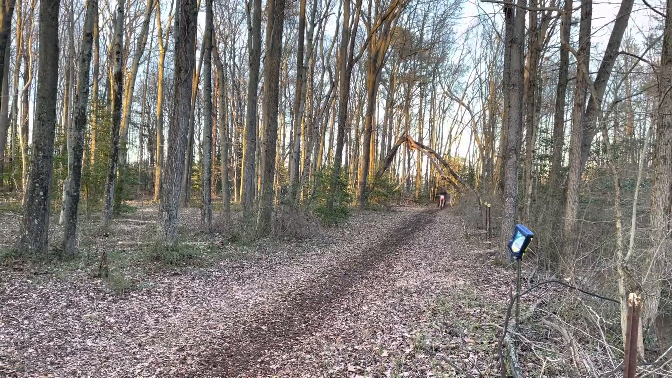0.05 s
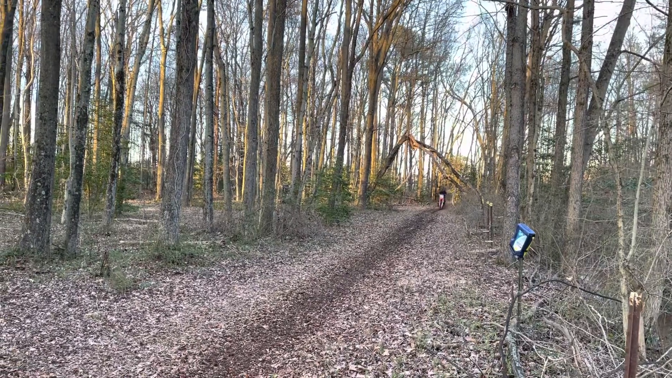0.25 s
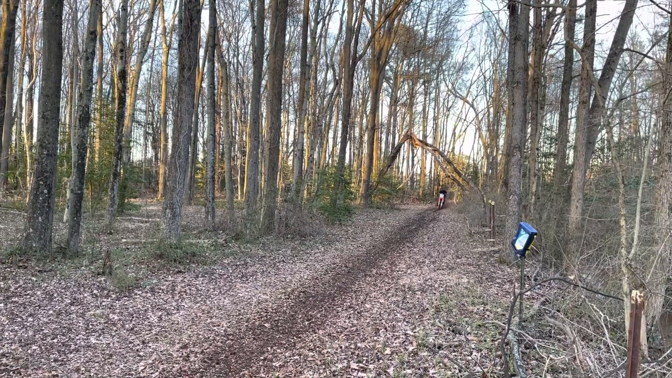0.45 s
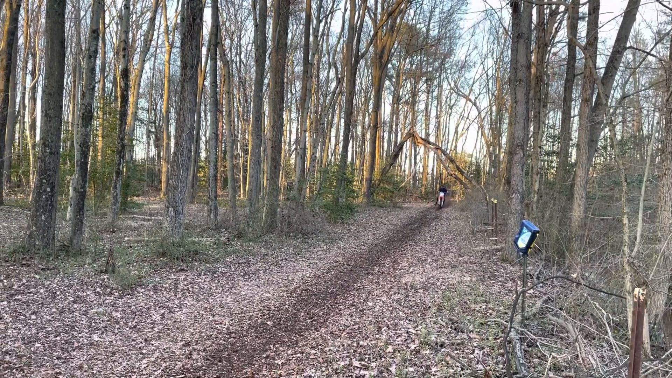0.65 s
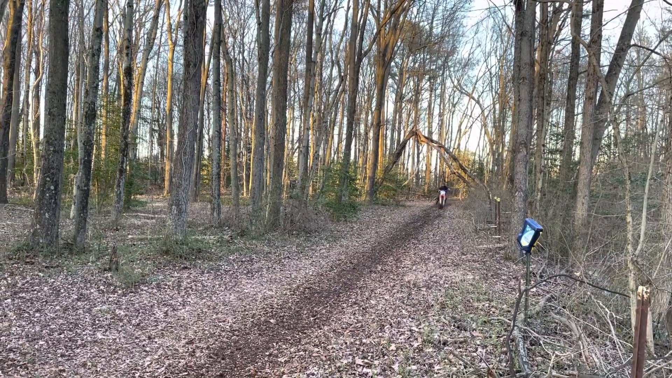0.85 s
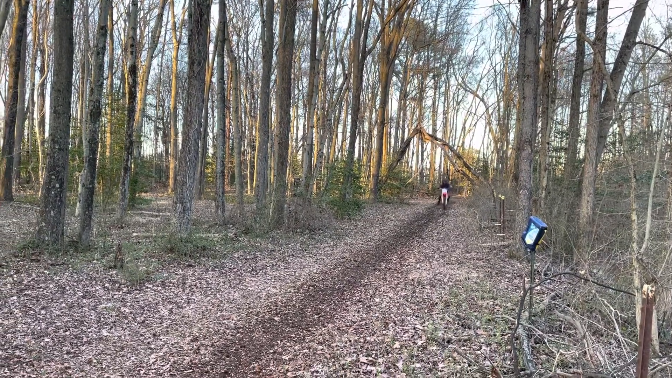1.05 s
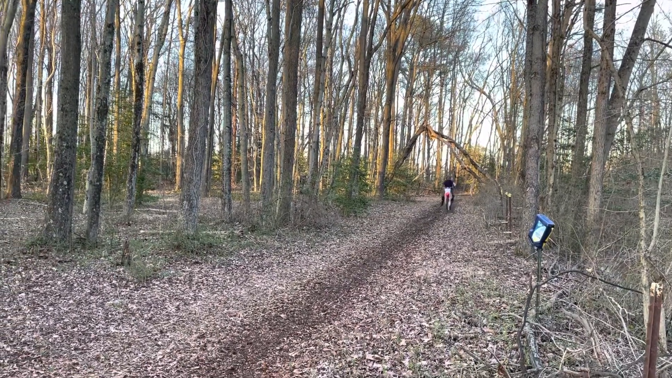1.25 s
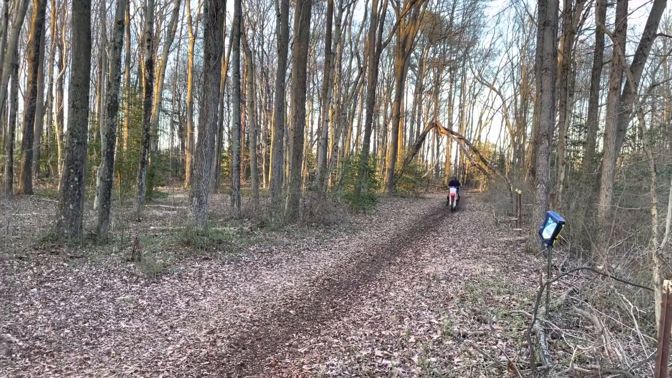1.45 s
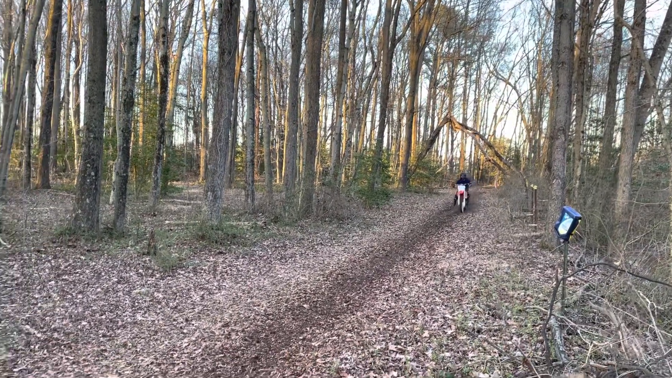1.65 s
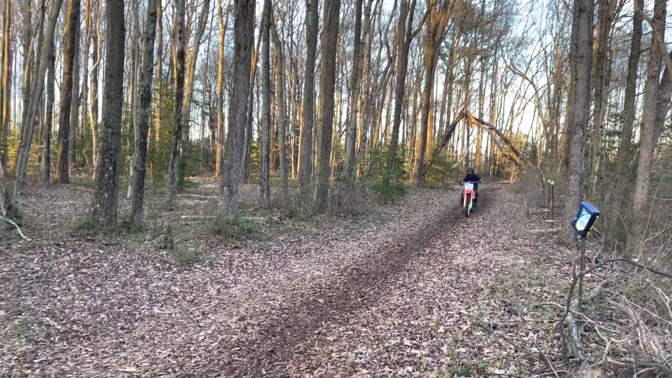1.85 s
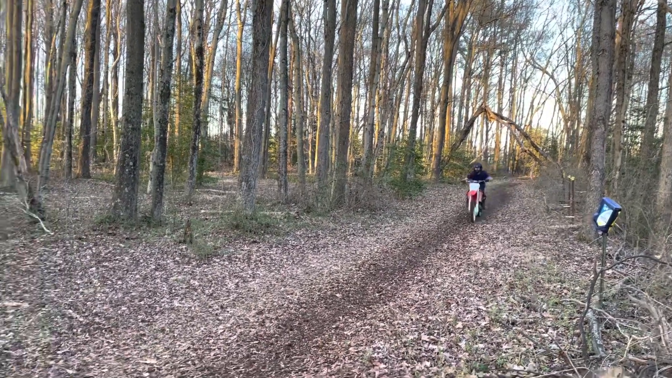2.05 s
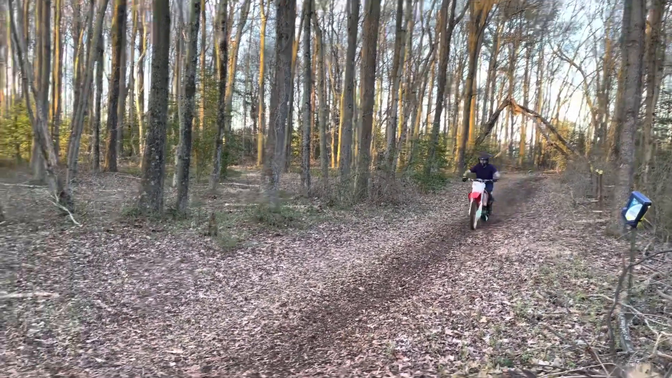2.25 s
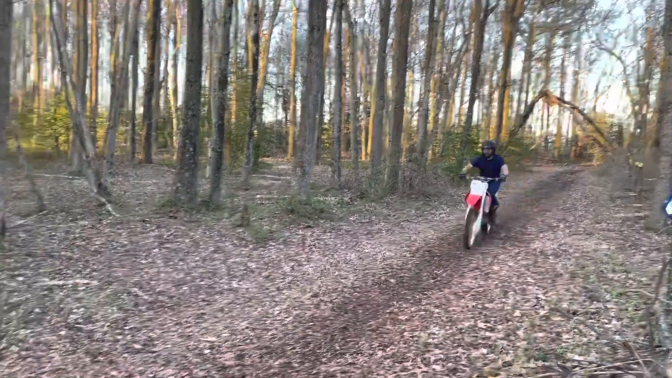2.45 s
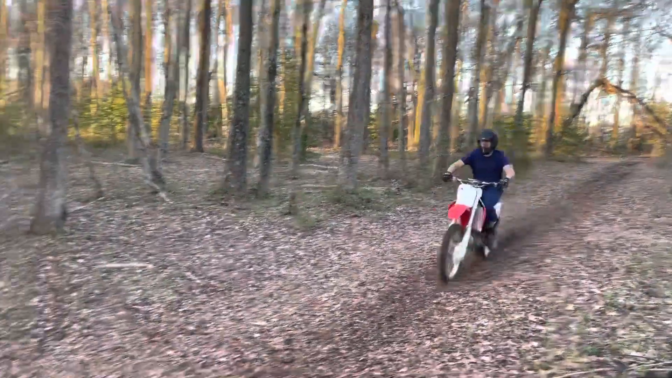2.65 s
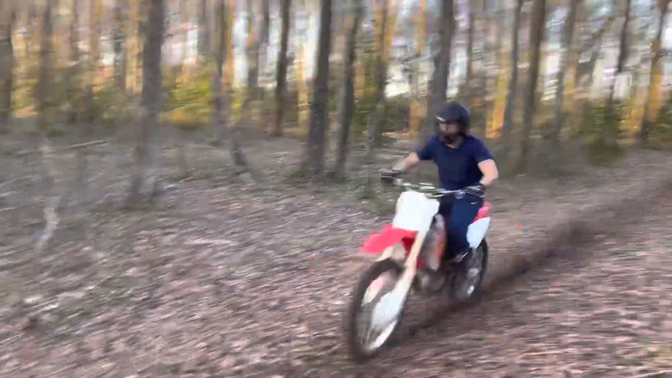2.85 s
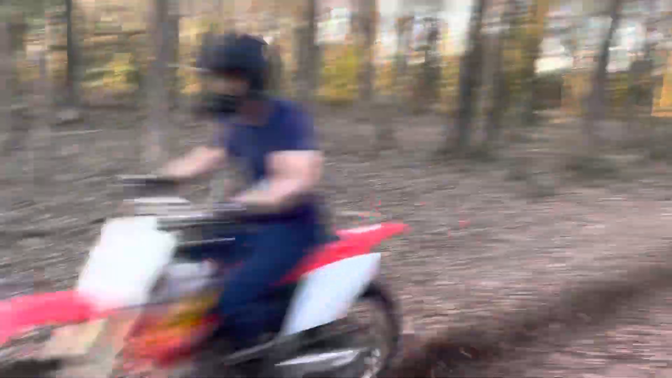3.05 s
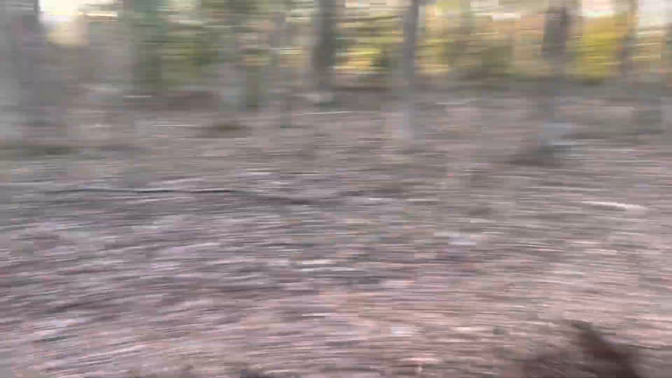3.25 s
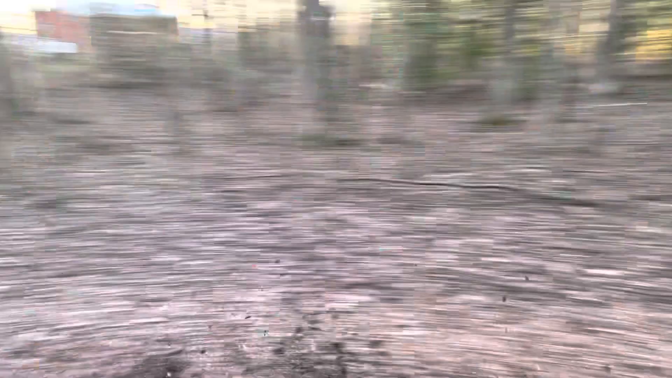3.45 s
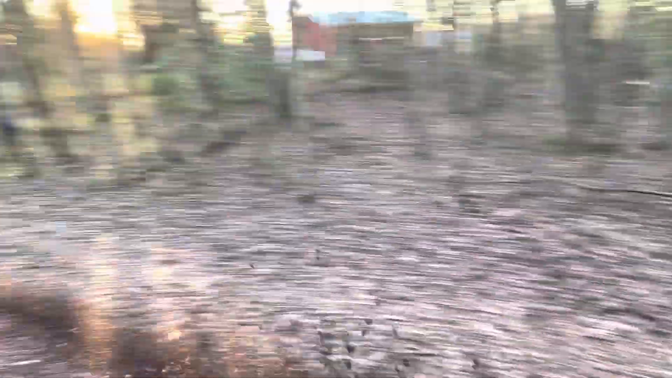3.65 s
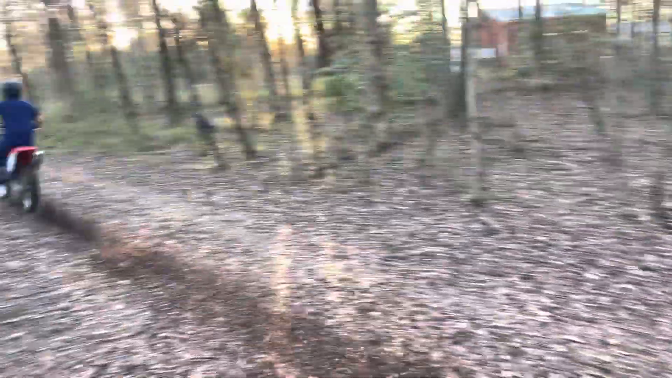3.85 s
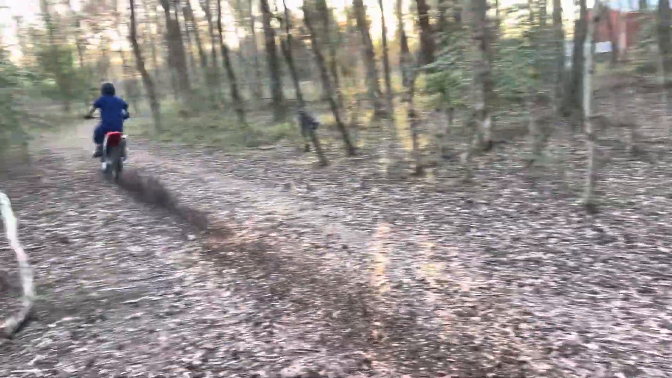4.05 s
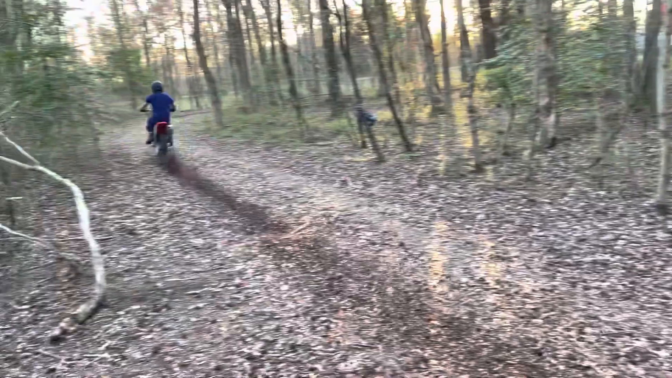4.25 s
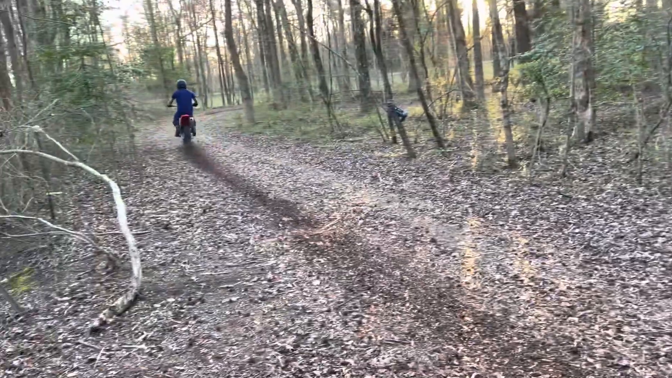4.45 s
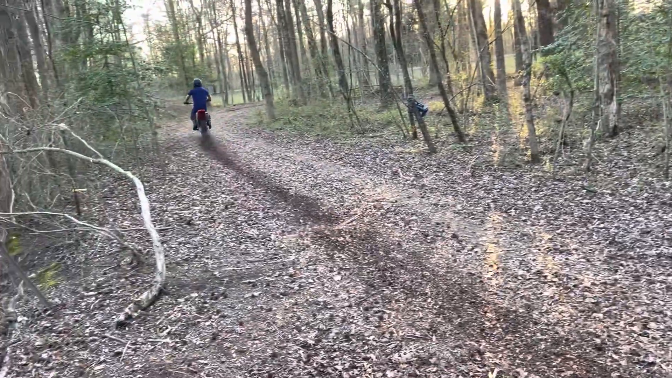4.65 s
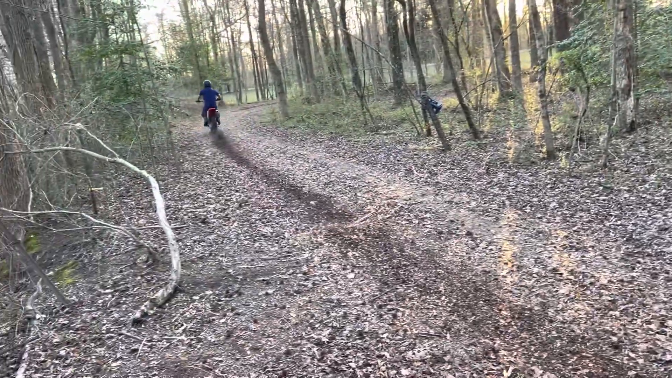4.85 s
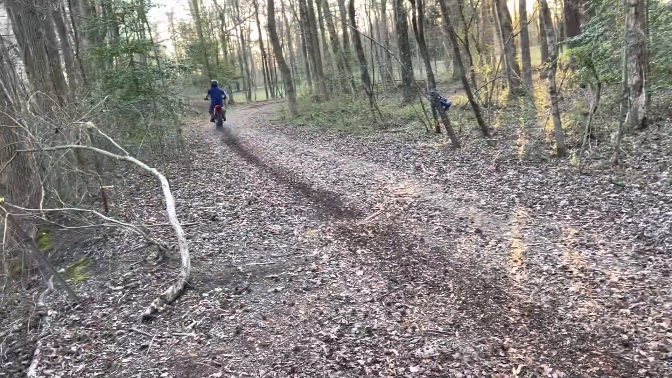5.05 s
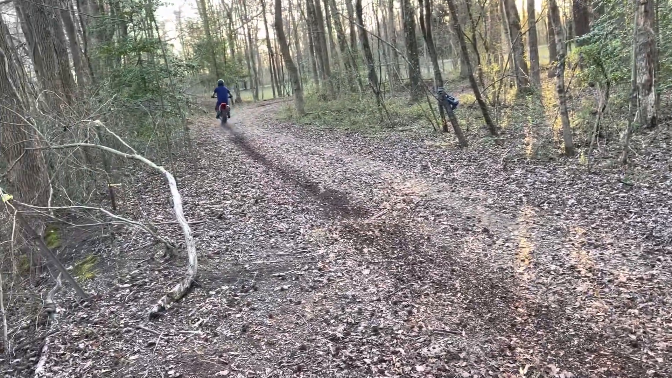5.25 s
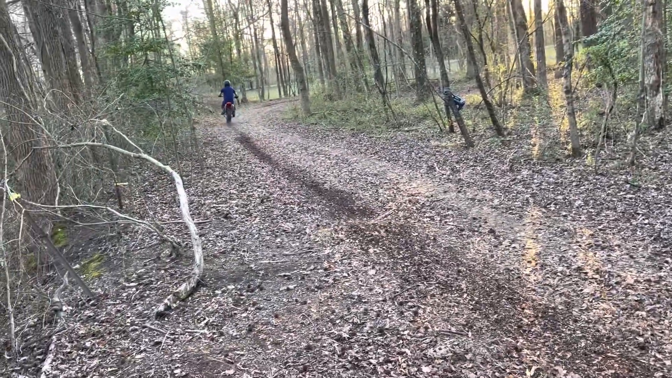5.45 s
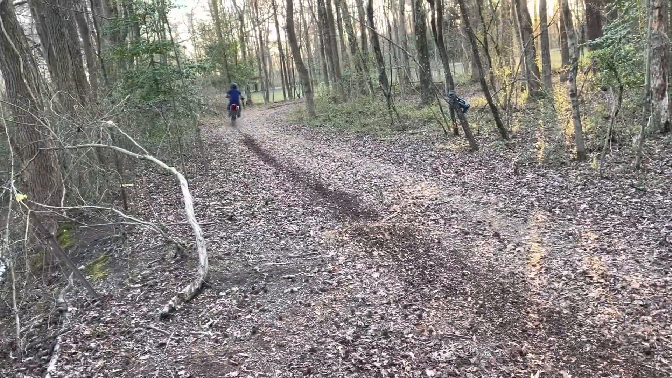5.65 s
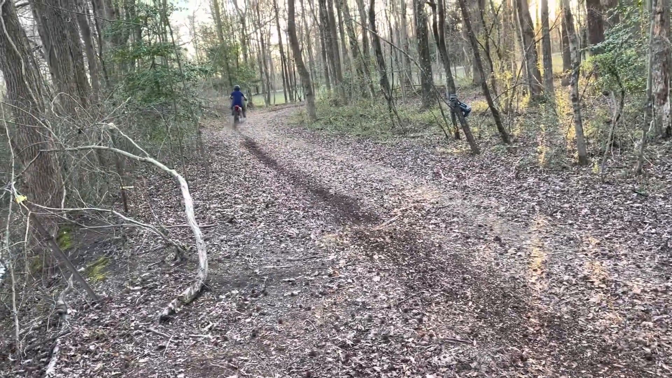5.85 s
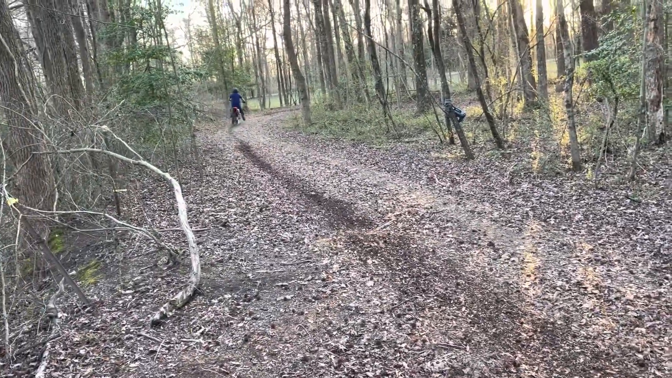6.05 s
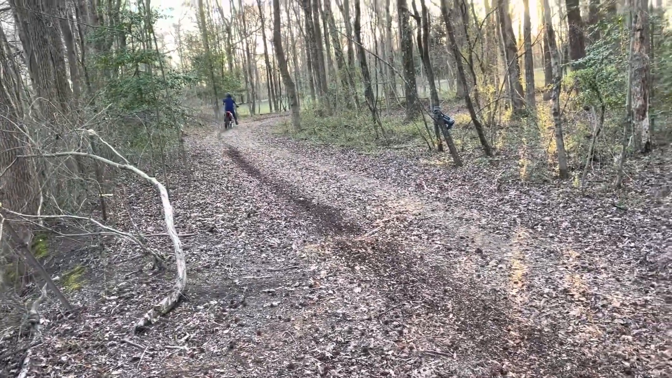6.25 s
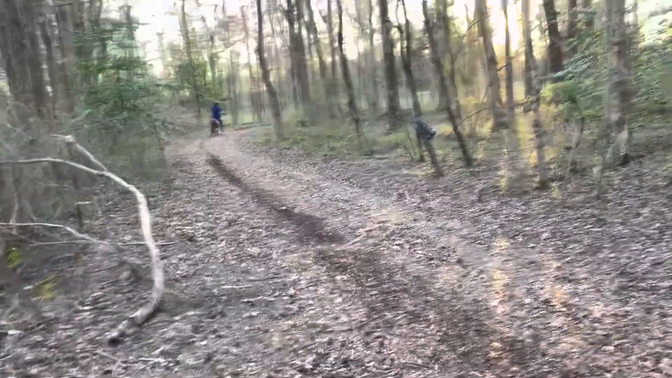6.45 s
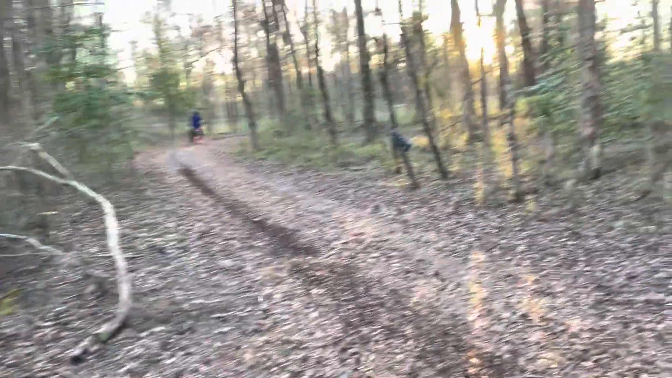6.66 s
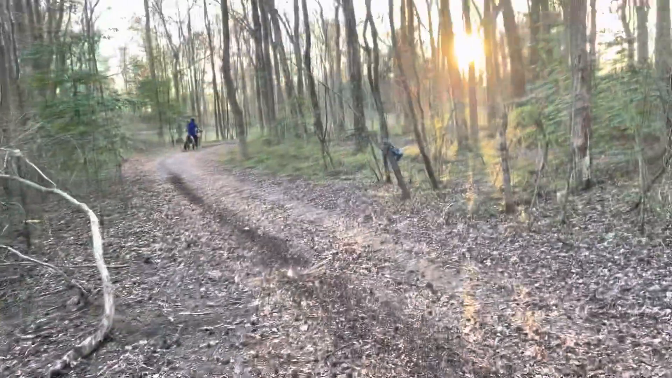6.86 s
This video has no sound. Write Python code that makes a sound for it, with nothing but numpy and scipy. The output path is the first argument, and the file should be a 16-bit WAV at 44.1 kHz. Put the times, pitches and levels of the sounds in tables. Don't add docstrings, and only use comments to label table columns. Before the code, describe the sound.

A dirt bike's low, raspy exhaust rises and dips as it nears a handheld microphone beside a leafy trail. It coasts down in pitch, sweeps past loudly with clattering engine noise and tyres crunching leaves, then breaks into separate slow thuds. A quick double bark of throttle follows, then a quieter uneven putter moving off. Dry twigs and brush stir nearby; tree trunks give a short, dull scatter.

```python
import sys
import numpy as np
from scipy import signal
from scipy.fft import rfft, irfft, next_fast_len
from scipy.io import wavfile
from scipy.ndimage import uniform_filter1d

SR = 44100
rng = np.random.default_rng(int(sys.argv[2]) if len(sys.argv) > 2 else 0)


def store_pcm(level_fs):
    pcm = np.round(np.clip(level_fs, -1, 1) * 32767).astype(np.int16)
    wavfile.write(sys.argv[1], SR, np.atleast_2d(pcm).T)


def gain_from_decibels(decibels):
    exponent = np.asarray(decibels, float) / 20
    return 10 ** exponent


N = 305157

PASS_S, NEAREST_M, COMING_M_PER_S, LEAVING_M_PER_S = 3.13, 2.2, 14, 10
SOUND_M_PER_S = 343
IDLE_HZ = 22
# [t/s, cycles f/Hz]
SPEED_COMING = [(0, 97.7), (.05, 111.4), (.09, 112.5), (.14, 113.1), (.22, 82.05), (.34, 87.35),
                (.47, 92.2), (.53, 91.06), (.69, 83.06), (.89, 94.88), (1.03, 88.47), (1.2, 94.33),
                (1.29, 99.93), (1.36, 113.4), (1.44, 98.97), (1.5, 81), (1.68, 94.7), (1.82, 100.4),
                (1.97, 105), (2.02, 104.7)]
# [t/s, cycles f/Hz]
SPEED_PASSING = [(2.16, 80.58), (2.31, 77.68), (2.52, 70.68), (2.77, 69.8), (2.87, 64.83), (3.036, 52.58),
                 (3.122, 47.35), (3.2, 47.12), (3.271, 41.3), (3.401, 35.8), (3.489, 30.1), (3.599, 26.1)]
# [t/s, cycles f/Hz]
SPEED_LEAVING = [(3.9, 22), (4.78, 22.5), (4.82, 33), (4.87, 38.5), (4.96, 37.5), (5.02, 42), (5.12, 42),
                 (5.18, 37.5), (5.232, 33.8), (5.294, 30.5), (5.39, 27), (5.45, 25.5), (5.6, 23.2),
                 (5.84, 23), (5.92, 32), (6.45, 30.5), (6.6, 28.5), (6.92, 26)]
# [t/s, throttle 0-1]
THROTTLE = [(0, 0.69), (.17, 0.84), (.26, 1), (.68, 0.95), (1.33, 0.88), (1.37, 0.3), (1.535, 0.26),
            (1.548, 0.81), (2.03, 0.66), (2.09, 0.16), (4.96, 0), (5.0, 0.94), (5.08, 0.14), (5.18, 0.23),
            (5.28, 0.22), (5.4, 0.01), (5.62, 0.16), (5.7, 0.46), (6.3, 0.13)]
# [t/s, pop level/dB, crack level/dB]
FIRINGS = [(3.546, -22, -26), (3.65, -16.5, -38), (3.809, -20, -42), (3.895, -18, -38), (3.985, -16.5, -29),
           (4.078, -16.5, -26), (4.171, -17.5, -30), (4.26, -20.5, -36), (4.358, -19, -26.5),
           (4.45, -18, -26), (4.543, -19.5, -26.5), (4.635, -19.5, -27), (4.724, -20, -30),
           (4.81, -12.5, -4), (4.841, -11.5, -5.5), (4.868, -15.5, -13.5), (4.997, 0, -1.5),
           (5.022, -8.5, -4), (5.046, -13, -10), (5.363, -31, -26), (5.518, -24.5, -45),
           (5.647, -22.5, -29), (5.734, -24, -23), (5.819, -23, -36), (5.931, -25, -47), (6.156, -29, -54),
           (6.348, -28, -44), (6.486, -27.5, -48), (6.623, -22, -34), (6.732, -28.5, -61),
           (6.768, -25, -49), (6.881, -28, -65)]
# [t/s, level/dB]
ODD_PUFFS = [(3.254, -8), (3.384, 3.5), (3.475, -1), (3.509, -2), (4.944, .1), (4.971, 2), (5.069, .1),
             (5.116, .1), (5.168, 3.5), (5.195, 5.5), (5.224, 6), (5.289, 1.5), (5.398, -3), (5.439, -7),
             (5.479, -6.5), (5.865, -7), (6.063, -3), (6.256, -1.5), (6.552, 0)]
# [t/s, moved from second to third order level/dB, first order level/dB,
# all orders level/dB]
GRIP = [(0, 7.5, 0, 3), (.04, -3.5, -3, 0), (.08, -12.5, 4, 3), (.14, -5, -7, 1.5), (.18, -1.5, 5, -0.3),
        (.24, -4.5, 0, 1), (.3, -8, 4, 1), (.37, 0, -5.5, .1), (.55, -1.5, 0.5, -3), (.7, -1, 2, -3),
        (.8, 0.5, -4, -1), (.86, -1.3, 3, -0.5), (1.05, -0.5, .1, 0), (1.25, 0.6, -0.8, -1.4),
        (1.34, -2.5, -3, 0.7), (1.4, -2, 3, -4), (1.47, -5, 1.5, -2), (1.55, 2, 0, 0.5), (1.75, 3, -5, 0.7),
        (1.92, 3, 2.5, 1.9), (2.0, -0.5, 0, 2.6), (2.1, -1, 2, 1.5), (2.3, -0.7, -1.5, -1.4),
        (2.7, 1.3, -0.3, 0.6), (2.9, 3, 7, 0.6), (3.1, 1.6, -5, 0.5), (3.25, -1, 1, -1.7)]

# [level near at idle/dB, rise per octave of speed/dB, rise at full throttle/dB,
# share of the distance loss (1 = all), nearest this much late t/s]
SONG_LAW = (-11.5, 2.05, 6.5, 0.7032, 0.51)
RASP_LAW = (-47, 19.5, 5, 1.37, 2)
TICK_LAW = (-33, 17, 8, 3, -4)
ROAR_LAW = (-43.5, 12, 9.5, 0.32, -0.12)
BOOM_LAW = (-5.5, -0.2, 3, 0, 7.5)
CASING_LAW = (3.3, 5.7, 3.5, 0.76, 0.22)
RUSTLE_LAW = (-32, 6, 7, 1.26, 0.11)
TREBLE_LAW = (2.05, .1, .1, 0.2, 0.11)
TREBLE_HZ = 8300
AIR_LAW, AIR_HZ = (.1, .1, .1, 0.23, .1), 12400
MODE_LAWS = [(-16.5, 0.1, 0.1, 0.47, 0.14), (-21, 15.9, 2.8, 0.55, 0.34), (-35, 20.3, 0.1, 2.1, 0.015),
             (-34, 4.1, .1, 0.42, 0.044), (-27, 11.4, 3.6, 0.27, 0.13), (-48, 11, .1, 4.5, 0.03),
             (-45, 14, .1, 2, 0.0092)]

# [f/Hz, width f/Hz, late t/s]
PIPE = [(74.8, 37, 0.002), (127.6, 60, 0.00583), (330, 95, 0.00316), (253, 62, 0.0036), (157.9, 19, 0.0072),
        (735, 180, 0.00415), (503, 170, 0.0018)]
FIRED_DB = [-6.5, -16.5, -30, -30, -7, -30, -29]
PUFF_UNEVEN_DB, MODE_UNEVEN_DB = 2.0, 2.0
LOUDEST_POP_DB = -9
HANDOVER_S = (3.25, 3.29)
SONG_LATE, SONG_SPREAD = .76, 0.201
# [f/Hz, level/dB]
PIPE_OPEN = [(60, -29.5), (95, -5.5), (190, -6), (260, 1), (322, 0.5), (358, -24.5), (430, -16),
             (510, -14.5), (600, -17), (900, -21.5)]
# [f/Hz, level/dB]
PIPE_SHUT = [(55, -9), (95, -1), (145, 7), (215, -11), (270, -5.5), (350, -1), (430, -19.5), (570, -11),
             (640, -17), (900, -31)]
# [f/Hz, level/dB]
PIPE_SIDE = [(55, -8), (110, -1.5), (165, 8.5), (220, -12.5), (290, -16.5), (390, -10.5), (450, -9.5),
             (520, -7), (600, -16), (700, -12), (900, -16.5)]
# [f/Hz, level/dB]
PIPE_TAIL = [(47, -13.5), (95, -1), (145, 5.5), (190, -8), (240, -9), (290, -2), (335, 2.5), (420, -10),
             (520, -22), (620, -23.5), (720, -7.5), (800, -9.5), (900, -11)]
TURNING_S = (2.85, 2.936, 3.14)
RASP_PAST_DB = -8.5
TICKS_FROM_S, TICK_UNEVEN_DB = 3.05, 4

# [f/Hz, level per Hz/dB]
ROAR = [(300, -9), (420, 0), (560, 4.5), (800, -1.5), (1000, 0), (1300, -2.5), (1700, -5), (2250, -3.5),
        (2600, -5.5), (2900, -10), (4500, -17.5), (7500, -29.5), (10000, -35), (13000, -50.5), (14500, -41),
        (16000, -47)]
# [f/Hz, likeness 0-1]
LIKENESS_ROAR = [(300, 1), (600, 0.7), (1300, 0.8), (2900, 0.81), (5000, 0.72), (6200, .92), (7500, 0.44),
                 (12000, 0.36)]
CHOPPY_S = (2.9, 3.1)
ABREAST_S, ABREAST_WIDTH_S, ABREAST_DB = 2.97, 0.14, 3.5
# [f/Hz, width f/Hz, level/dB]
CASING = [(880, 38, -6), (1480, 280, -5), (2118, 19, 4.5), (1933, 50, -6), (2564, 40, 0), (2405, 40, -9),
          (3540, 240, -2.5)]
CASING_LATE_S, CASING_GLIDE = -.22, 1.3
CASING_FLICKER_DB, CASING_WANDER_S = 4.0, .0002
CASING_HIDES_S, CASING_HIDDEN_DB = 3.08, -12.5
# [t/s, upper f/Hz, upper level/dB, lower f/Hz, lower level/dB]
GEARS = [(2.2, 2450, -60, 1500, -70), (2.36, 2400, -36, 1500, -70), (2.5, 2330, -38, 1500, -70),
         (2.6, 2500, -55, 1480, -60), (2.8, 2600, -36, 1450, -42), (2.88, 2250, -33, 1440, -42),
         (2.97, 2030, -30, 1470, -34), (3.06, 2080, -33, 1490, -31), (3.14, 2050, -55, 1430, -55)]
GEARS_DB = -1.5

# [f/Hz, level per Hz/dB]
RUSTLE = [(350, -6), (500, 0.5), (820, 1), (1000, -1.5), (1200, -3.5), (1700, -14.5), (2200, -16.5),
          (3500, -9.5), (7500, -15), (10000, -20.5), (13000, -25), (14500, -19), (16000, -36)]
# [f/Hz, likeness 0-1]
LIKENESS_RUSTLE = [(300, 0.53), (600, 0.78), (1300, 0.076), (2900, 0.44), (5000, 0.78), (6200, .92),
                   (7500, 0.39), (12000, 0.47)]
# [f/Hz, width f/Hz, level/dB, strongest t/s, lasts t/s]
HOLLOW = [(1214, 100, 8.5, 4.05, 0.23), (2170, 300, 10.5, 3.27, 0.27), (2650, 80, -3, 5.8, .6),
          (3420, 120, 3, 3.42, 0.14), (1140, 91, 6.5, 5.9, 0.54), (830, 44, -1, 3.81, 0.25)]
# [t/s, peak level/dB]
SNAPS = [(3.935, -31), (4.009, -32.5), (4.174, -31.5), (4.772, -31), (4.812, -61), (4.8389, -61), (5, -60),
         (5.0236, -45), (5.272, -51), (5.6636, -40), (5.674, -42), (5.6986, -44), (5.845, -45),
         (6.0677, -36), (6.088, -30), (6.337, -22.5), (6.365, -40), (6.884, -29.5)]
# [t/s, level/dB, swells in t/s, dies in t/s]
BRUSH = [(3.79, -39, 0.85, 0.46), (5.675, -38, 0.01, 0.063), (6.26, -37, 0.25, 0.026),
         (6.34, -46, 0.068, 0.078), (6.447, -37.5, 0.28, 0.23)]
# [f/Hz, level per Hz/dB]
BRUSH_COLOUR = [(880, -13), (1500, -15.5), (2730, -0.5), (6900, -10), (8300, -7), (10000, -9), (13000, -11),
                (14500, -9), (16000, -22)]
BRUSH_FALL_DB = 18

# [t/s, lag/ms]
RIGHT_LAG = [(0, 0.2), (2.8, 0.02), (3.2, 0.41), (3.7, 0.2), (6.92, 0.35)]
# [f/Hz, phase/rad]
PORTS = [(0, 0), (1120, -0.68), (1720, -1), (2670, 1.15), (3270, 0.34), (4100, .2), (4800, .6), (5500, 0),
         (6200, -.3), (6800, -1.2), (7500, -2.8), (8200, -3.14), (8900, -3.4), (9600, -4.5), (10300, -5.8),
         (11000, -6.28), (12400, -6.4), (13000, -7), (13700, -9.2), (14200, -9.42)]
# [f/Hz, level/dB]
LEFT_GAIN = [(0, 0.8), (300, -0.8), (600, 0.6), (2500, -0.5), (4500, 3), (7500, 0.5), (9000, -1.5),
             (14000, 5)]
HISS_LEFT_DB = 1.5


def crank(speed):
    turns = np.cumsum(speed) / SR
    at = (np.sort([row[0] for row in FIRINGS + ODD_PUFFS]) * SR).astype(int)
    whole = np.cumsum(np.round(np.diff(turns[at], prepend=0)))
    return turns + np.interp(np.arange(N), at, whole - turns[at])


def song(turns, speed, throttle):
    end = int(HANDOVER_S[1] * SR)
    t = np.arange(end) / SR
    level_db = loudness(SONG_LAW, speed, throttle)[:end]
    jitter = .016 * (.1 + 1.2 * throttle) * drift(25)
    cycles = (turns + jitter)[:end]
    speed, throttle = speed[:end], throttle[:end]
    grip_db, first_db, all_db = [curve[:end] for curve in in_time(GRIP)]
    side = np.interp(t, TURNING_S, (0, 0.78, 0))
    tail = np.interp(t, TURNING_S, (0, 0, 0.9))
    out = np.zeros(N)
    for k in range(1, 19):
        hz = k * speed
        ahead_db = throttle * at_hz(PIPE_OPEN, hz) + (1 - throttle) * at_hz(PIPE_SHUT, hz)
        db = (1 - side - tail) * ahead_db + side * at_hz(PIPE_SIDE, hz) + tail * at_hz(PIPE_TAIL, hz)
        db = db + level_db + all_db
        db = db + grip_db * ((k == 3) - .5 * (k == 2)) + first_db * (k == 1)
        db = db - 40 * np.clip(hz / 500 - 2, 0, 1)
        waver_db = (1.3 + 4.0 * throttle / k) * drift(14)[:end]
        phase = 2 * np.pi * k * (cycles - SONG_LATE) + SONG_SPREAD * (k - 1) ** 2
        out[:end] -= np.sqrt(2) * gain_from_decibels(db + waver_db) * np.cos(phase)
    return out


def pipe(begins, levels_db, uneven_db):
    fired = np.min(np.abs(begins[:, None] - np.array(FIRINGS)[:, 0]), axis=1) < .004
    steadier = IDLE_HZ * np.gradient(begins)
    puff_db = uneven_db * steadier * chance(begins)
    s, odd_db = np.transpose(ODD_PUFFS)
    puff_db = puff_db + (np.abs(begins[:, None] - s) < .004) @ odd_db
    out = np.zeros(N)
    start = int((HANDOVER_S[0] - .2) * SR)
    for (hz, width, late_s), db, fired_db in zip(PIPE, levels_db, FIRED_DB):
        own_db = puff_db + MODE_UNEVEN_DB * steadier * chance(begins)
        times = begins + late_s
        puffs = np.array([clicks(times, puff_db), clicks(times, own_db + fired_db * fired)])[:, start:]
        rung = resonance(puffs + 1e-18, hz, 2.2 * width)
        every, unfired = resonance(resonance(rung, hz, width), hz, width)
        out[start:] += gain_from_decibels(db[start:]) * unfired / running_rms(every)
    return out


def pops(speed):
    out = np.zeros(N + SR)
    t = np.arange(SR // 20) / SR
    for s, pop_db, crack_db in FIRINGS:
        i = int(s * SR)
        heat = speed[i] - 22 + 0.27 * max(crack_db + 20.5, 0)
        pop = sweep(start_hz=232 + 13 * heat, end_hz=96 + 1.95 * heat,
                    fall_s=0.0054 / (1 + 0.04 * heat), length_s=0.02 + 0.00017 * heat)
        swell = np.exp((22 - 3.36 * heat) * t)
        out[i:i + len(pop)] += gain_from_decibels(min(pop_db, LOUDEST_POP_DB) + 8) * pop * swell
    return out[:N]


def sweep(start_hz, end_hz, fall_s, length_s):
    t = np.arange(SR // 20) / SR
    cycles = end_hz * t + start_hz * fall_s * (1 - np.exp(-t / fall_s))
    return -np.sin(2 * np.pi * cycles) * (1 - np.exp(-t / 0.0018)) / (1 + (t / length_s) ** 8)


def rasp(begins, level_db, uneven_db):
    front = sweep(start_hz=740, end_hz=250.0, fall_s=0.0025, length_s=0.035)
    train = signal.fftconvolve(clicks(begins, uneven_db * chance(begins)), front)[:N]
    band = signal.butter(4, [335, 1000], "band", fs=SR, output="sos")
    return gain_from_decibels(level_db) * evened(signal.sosfilt(band, train))


def cracks(begins, tick_db):
    t = np.arange(SR // 100) / SR
    rings = 1.15 * np.sin(2 * np.pi * 1180 * t) + 0.78 * np.sin(2 * np.pi * 1600 * t)
    rings = rings * (1 - np.exp(-t / 0.00066)) * np.exp(-t / .0014)
    rings = rings + gain_from_decibels(-7.5) * np.sin(2 * np.pi * 740 * t) * np.exp(-t / 0.0023)
    band = signal.butter(2, [2200, 6500], "band", fs=SR, output="sos")
    spit = gain_from_decibels(-15.0) * signal.sosfilt(band, rng.standard_normal(len(t)) * np.exp(-t / 0.0031))
    s, _, db = np.transpose(FIRINGS)
    slow = begins[begins > TICKS_FROM_S]
    weak_db = tick_db[(slow * SR).astype(int)] + TICK_UNEVEN_DB * chance(slow)
    shocks = np.maximum(clicks(s, db + 3.0), clicks(slow, weak_db))
    return signal.fftconvolve(shocks, rings + spit)[:N]


def roar(turns, level_db, casing_db, boom_db, depth):
    gate = 1 + depth * np.exp(-(turns % 1) / 0.22)
    gas = banded_noise(ROAR, LIKENESS_ROAR, patchy_db=0.5)
    rings = 0
    for hz, width, db in CASING:
        ring = resonance(resonance(gas, hz, 2 * width), hz, width)
        rings = rings + gain_from_decibels(db + CASING_FLICKER_DB * drift(5.3)) * ring
    gas = gas + (gain_from_decibels(boom_db) - 1) * resonance(gas, hz=560, width_hz=700)
    travel_s = CASING_GLIDE * distance(CASING_LATE_S) / SOUND_M_PER_S
    sent = (np.arange(N) - travel_s * SR + CASING_WANDER_S * SR * drift(3.97)) % N
    heard = np.array([np.interp(sent, np.arange(N), side) for side in rings])
    return gain_from_decibels(level_db) * gate * (gas + gain_from_decibels(casing_db) * heard)


def gears():
    upper, upper_db, lower, lower_db = in_time(GEARS)
    narrow = signal.butter(2, 35, fs=SR, output="sos")
    hoarse = signal.sosfilt(narrow, rng.standard_normal((2, 2, N)))
    out = 0
    for hz, db, (a, b) in zip((upper, lower), (upper_db, lower_db), hoarse):
        turn = 2 * np.pi * np.cumsum(hz) / SR
        out = out + gain_from_decibels(db + GEARS_DB) * rms_one(a * np.sin(turn) + b * np.cos(turn))
    return out


def leaves(level_db):
    s, db = np.transpose(SNAPS)
    tick = rng.standard_normal((2, 200)) * np.exp(-np.arange(200) / 37.0)
    bright = signal.sosfilt(signal.butter(2, 3500, "high", fs=SR, output="sos"), tick)
    snaps = signal.fftconvolve(clicks(s, db + 3.0)[None], bright)[:, :N]
    rustle = banded_noise(RUSTLE, LIKENESS_RUSTLE, patchy_db=1.72)
    t = np.arange(N) / SR
    hollow = 0
    for hz, width, db, at_s, lasts_s in HOLLOW:
        hollow = hollow + gain_from_decibels(db) * np.exp(-((t - at_s) / lasts_s) ** 2) * resonance(rustle, hz, width)
    return gain_from_decibels(level_db + 5) * (rustle + hollow) + snaps


def brush():
    t = np.arange(N) / SR
    level = 0
    for s, db, swells_s, dies_s in BRUSH:
        away = np.maximum((s - t) / swells_s, (t - s) / dies_s)
        level = level + gain_from_decibels(db - BRUSH_FALL_DB * away)
    return level * banded_noise(BRUSH_COLOUR, LIKENESS_RUSTLE, patchy_db=4.0)


def trunks(x, t60_s, low_hz, high_hz):
    t = np.arange(SR // 2) / SR
    tail = rng.standard_normal((2, len(t))) * gain_from_decibels(-60 * t / t60_s) * (1 - np.exp(-t / 0.011))
    tail = signal.sosfilt(signal.butter(2, [low_hz, high_hz], "band", fs=SR, output="sos"), tail)
    return signal.fftconvolve(x[None], tail / np.sqrt(np.sum(tail ** 2) / 2))[:, :N]


def distance(late_s):
    t = np.arange(N) / SR - PASS_S - late_s
    return np.hypot(NEAREST_M, t * np.where(t < 0, COMING_M_PER_S, LEAVING_M_PER_S))


def loudness(law, speed, throttle):
    idle_db, octave_db, open_db, share, late_s = law
    loss_db = 20 * np.log10(distance(late_s) / NEAREST_M)
    return idle_db + octave_db * np.log2(speed / IDLE_HZ) + open_db * throttle - share * loss_db


def dulled(x, treble_db, hz):
    low, high = [signal.sosfilt(signal.butter(5, hz, kind, fs=SR, output="sos"), x) for kind in ("low", "high")]
    return low + gain_from_decibels(treble_db) * high


def banded_noise(spectrum, likeness, patchy_db):
    out = 0
    edges = 280 * 2 ** np.arange(0, 6.1, .5)
    white = rng.standard_normal((2, 2, N))
    together = drift(13.3)
    for k, (low, high) in enumerate(zip(edges, edges[1:])):
        band = signal.butter(2, [low, high], "band", fs=SR, output="sos")
        mid, side = signal.sosfilt(band, white[k % 2])
        alike = np.clip(at_hz(likeness, np.sqrt(low * high)), 0, 1)
        gain = gain_from_decibels(patchy_db * (0.62 * together + drift(6.5)))
        out = out + gain * (np.sqrt(1 + alike) * mid + np.sqrt(1 - alike) * side * [[1], [-1]])
    size = next_fast_len(N)
    hz = np.arange(1, size // 2 + 2) * SR / size
    return rms_one(irfft(rfft(out, size) * gain_from_decibels(at_hz(spectrum, hz)), size)[:, :N])


def resonance(x, hz, width_hz):
    r = np.exp(-np.pi * width_hz / SR)
    poles = [1, -2 * r * np.cos(2 * np.pi * hz / SR), r * r]
    return signal.lfilter([(1 - r * r) / 2, 0, (r * r - 1) / 2], poles, x)


def clicks(times, db):
    out = np.zeros(N)
    out[np.clip((np.asarray(times) * SR).astype(int), 0, N - 1)] = gain_from_decibels(np.asarray(db))
    return out


def chance(begins):
    return rng.standard_normal(2000)[:len(begins)]


def drift(hz):
    points = rng.standard_normal(N // 100 + 500)
    slow = signal.sosfilt(signal.butter(2, hz, fs=SR / 100, output="sos"), points)[498:]
    return np.interp(np.arange(N) / 100, np.arange(len(slow)), rms_one(slow))


def in_time(rows):
    s, *columns = np.transpose(rows)
    return [np.interp(np.arange(N) / SR, s, c) for c in columns]


def at_hz(points, hz):
    f, value = np.transpose(points)
    return np.interp(np.log(hz), np.log(f), value)


def rms_one(x):
    return x / np.sqrt(np.mean(x ** 2) + 1e-20)


def running_rms(x):
    span = SR // 10
    return np.sqrt(uniform_filter1d(uniform_filter1d(x ** 2, span), span) + 1e-12)


def evened(x):
    return x / running_rms(x)


def scene():
    t = np.arange(N) / SR
    speed = in_time(SPEED_COMING + SPEED_PASSING + SPEED_LEAVING)[0]
    throttle = np.clip(in_time(THROTTLE)[0], 0, 1)
    turns = crank(speed)
    begins = np.flatnonzero(np.diff(np.floor(turns)) > 0) / SR

    def level(law):
        return loudness(law, speed, throttle)

    slowed = np.interp(t, HANDOVER_S, (0, 1))
    puffs = pipe(begins, [level(law) for law in MODE_LAWS], uneven_db=PUFF_UNEVEN_DB)
    low = (1 - slowed) * song(turns, speed, throttle) + slowed * puffs + pops(speed)
    sharp = rasp(begins, level(RASP_LAW) + RASP_PAST_DB * slowed, uneven_db=3.0)
    sharp = sharp + cracks(begins, level(TICK_LAW))
    lag = in_time(RIGHT_LAG)[0] * SR / 1000
    late = np.interp(np.arange(N) - lag, np.arange(N), low + sharp)

    roar_db = level(ROAR_LAW) + ABREAST_DB * np.exp(-((t - ABREAST_S) / ABREAST_WIDTH_S) ** 2)
    past_s = t - CASING_HIDES_S
    facing_db = np.interp(past_s, (-0.47, -0.018), (0, 3))
    casing_db = level(CASING_LAW) + np.where(past_s > 0.05, CASING_HIDDEN_DB, facing_db)
    depth = 0.6 + 0.64 * np.interp(t, CHOPPY_S, (0, 1))
    hiss = roar(turns, roar_db, casing_db, level(BOOM_LAW), depth) + leaves(level(RUSTLE_LAW))
    hiss = dulled(hiss, level(TREBLE_LAW), TREBLE_HZ) + brush() + gears()
    hiss = dulled(hiss, level(AIR_LAW), AIR_HZ)
    sides = gain_from_decibels(.5 * HISS_LEFT_DB * np.array([[1], [-1]]))

    scattered = gain_from_decibels(-20) * trunks(low + gain_from_decibels(6.5) * sharp, t60_s=0.54, low_hz=255, high_hz=4860)
    return np.array([low + gain_from_decibels(4.5) * sharp, late]) + sides * hiss + scattered


def roll_off(x):
    return signal.sosfilt(signal.butter(12, 15900, fs=SR, output="sos"), x)


def record(dry):
    size = next_fast_len(N)
    hz = np.arange(size // 2 + 1) * SR / size
    phase = np.interp(hz, *np.transpose(PORTS))
    turn = np.exp(-1j * phase) * gain_from_decibels(-np.interp(hz, *np.transpose(LEFT_GAIN)))
    right_port = irfft(rfft(dry[1], size) * turn, size)[:N]
    left, right = 1.198 * np.tanh(np.array([dry[0], right_port]) / 1.418)
    gap = signal.cheby2(6, 45, [7800, 8900], "bandstop", fs=SR, output="sos")
    top = signal.cheby2(12, 30, 14200, fs=SR, output="sos")
    side_gap = signal.cheby2(6, 40, [10600, 12700], "bandstop", fs=SR, output="sos")
    mid = signal.sosfilt(np.vstack([gap, top]), left + right) / 2
    side = signal.sosfilt(side_gap, left - right) / 2
    return roll_off(np.array([mid + side, mid - side]))


dry = scene()
out = record(dry)
store_pcm(out)
```